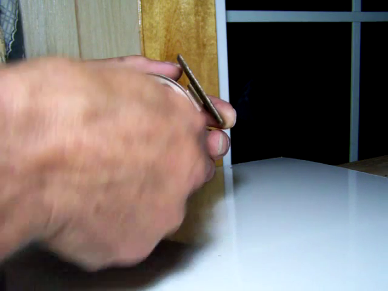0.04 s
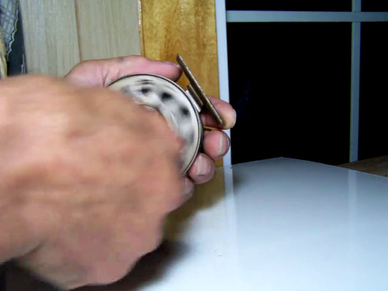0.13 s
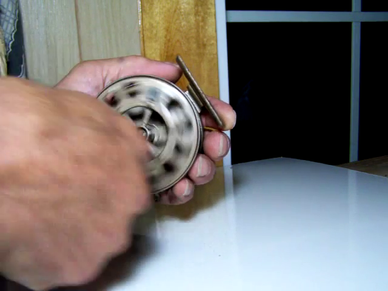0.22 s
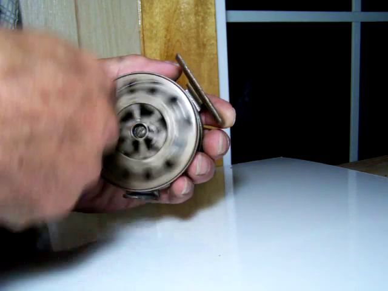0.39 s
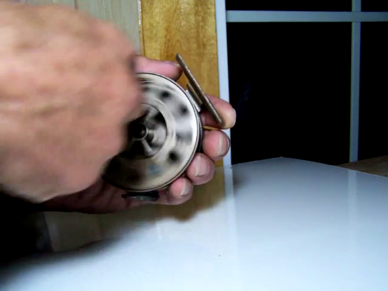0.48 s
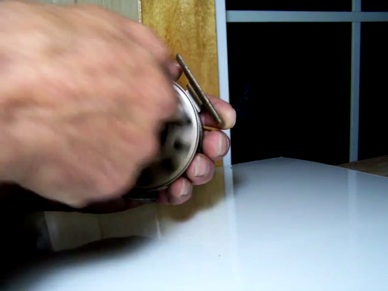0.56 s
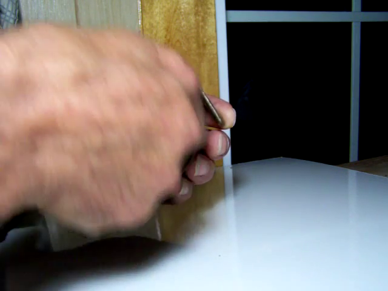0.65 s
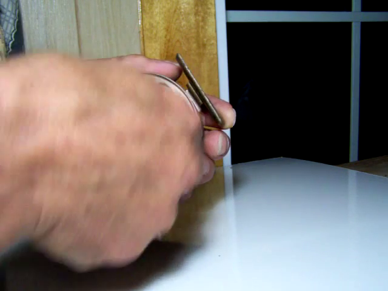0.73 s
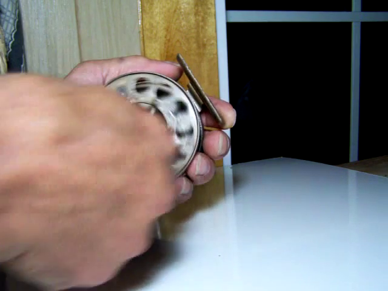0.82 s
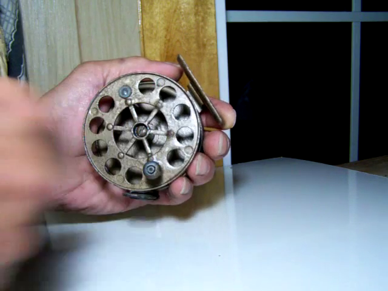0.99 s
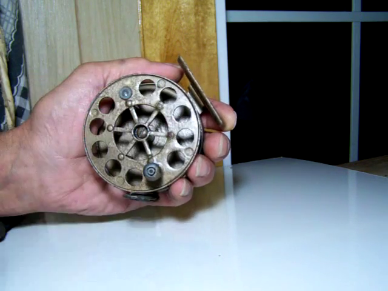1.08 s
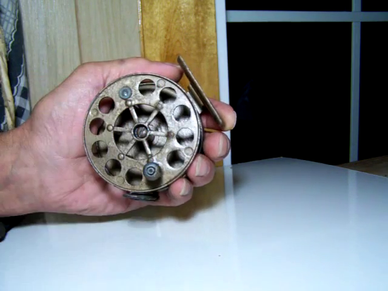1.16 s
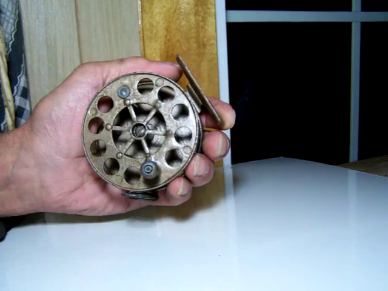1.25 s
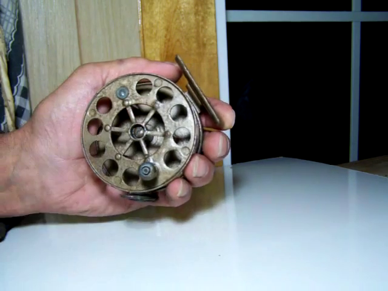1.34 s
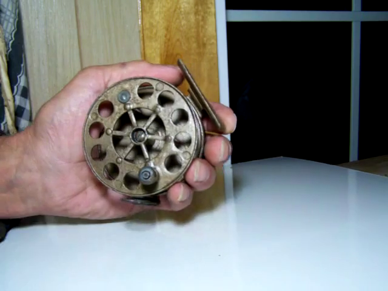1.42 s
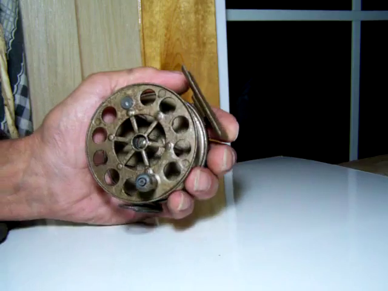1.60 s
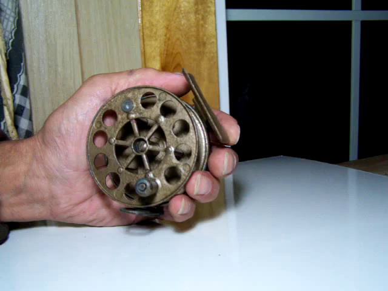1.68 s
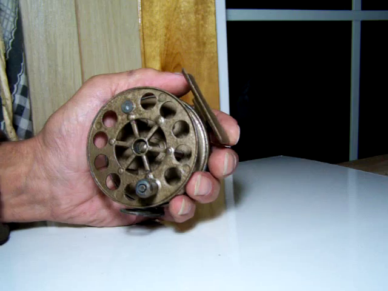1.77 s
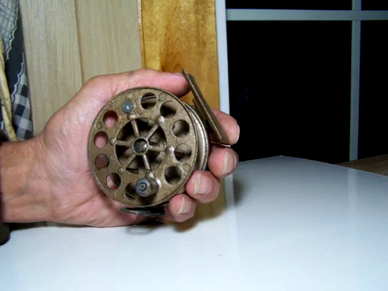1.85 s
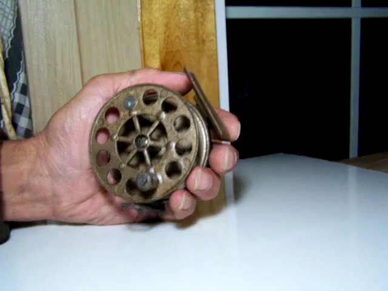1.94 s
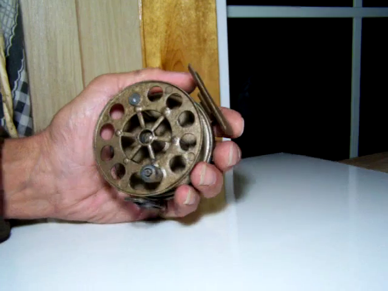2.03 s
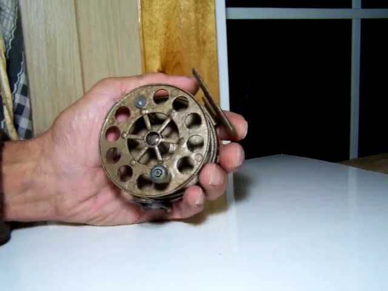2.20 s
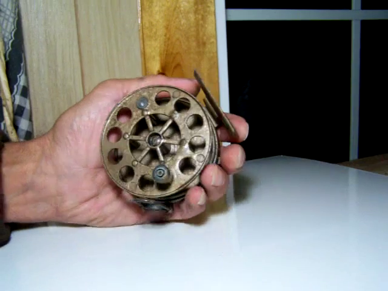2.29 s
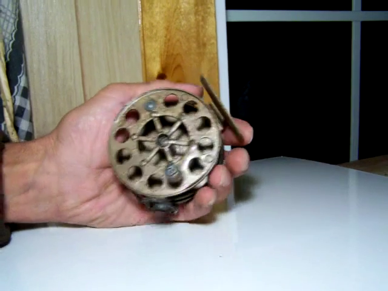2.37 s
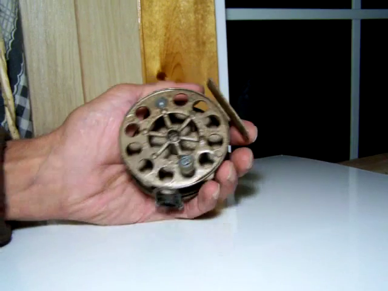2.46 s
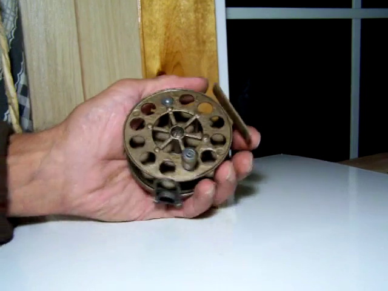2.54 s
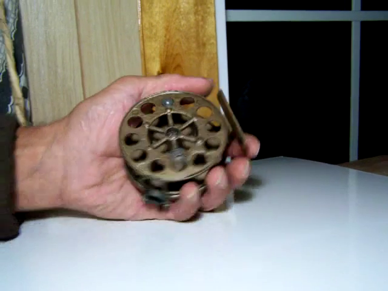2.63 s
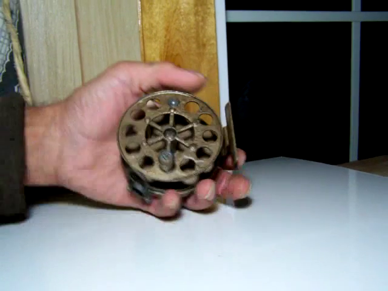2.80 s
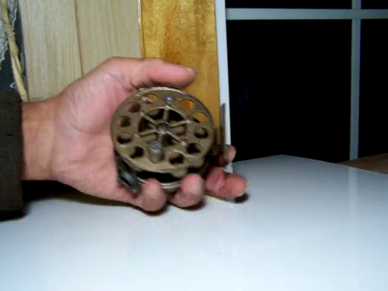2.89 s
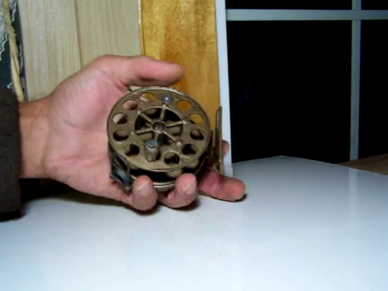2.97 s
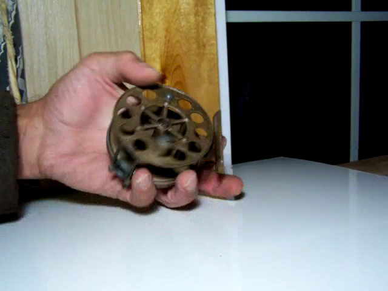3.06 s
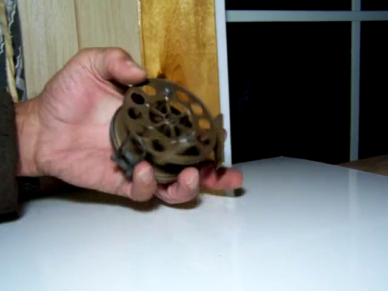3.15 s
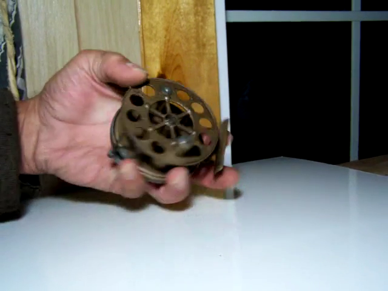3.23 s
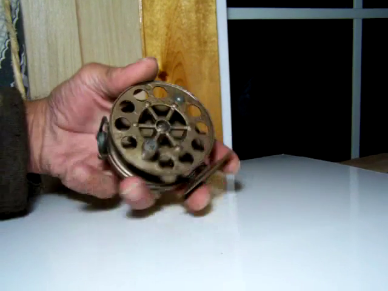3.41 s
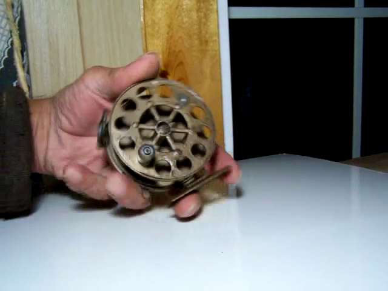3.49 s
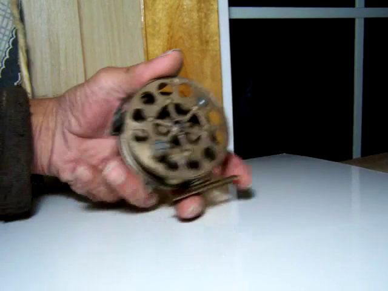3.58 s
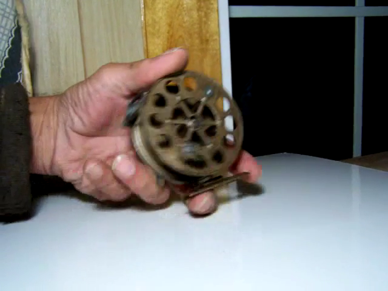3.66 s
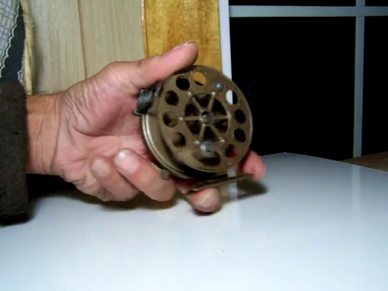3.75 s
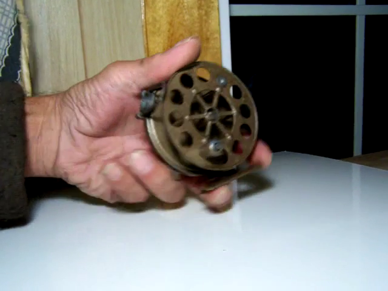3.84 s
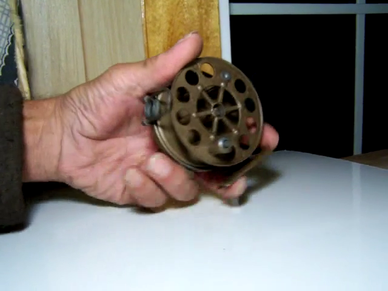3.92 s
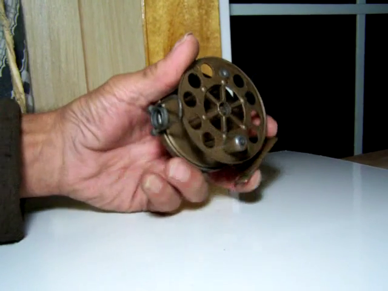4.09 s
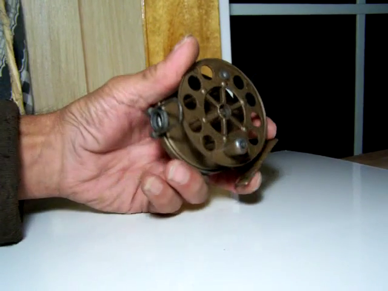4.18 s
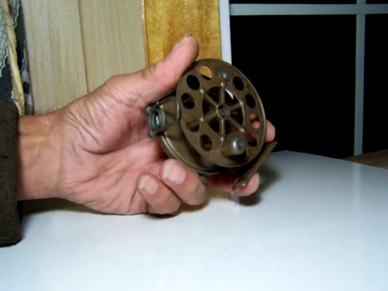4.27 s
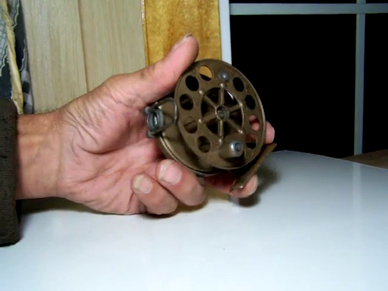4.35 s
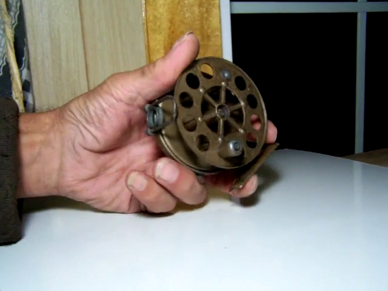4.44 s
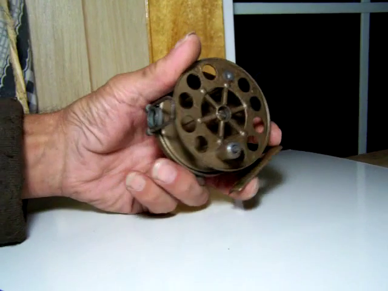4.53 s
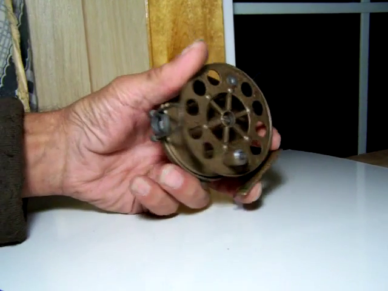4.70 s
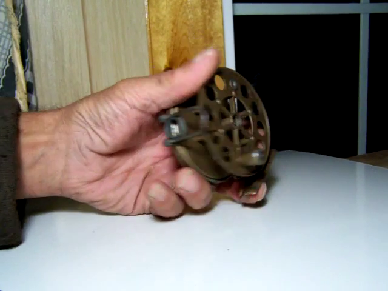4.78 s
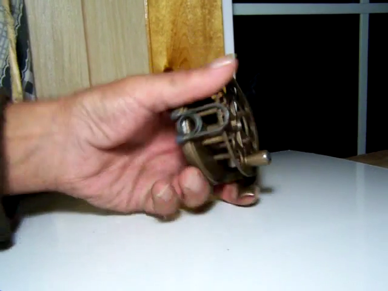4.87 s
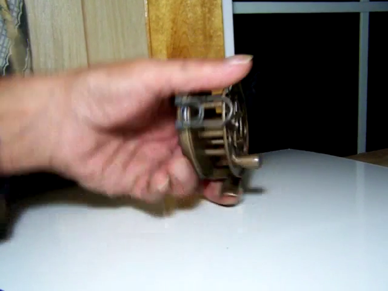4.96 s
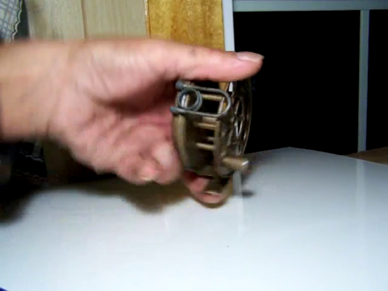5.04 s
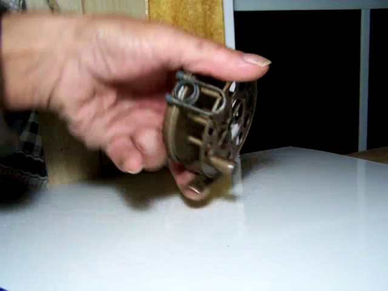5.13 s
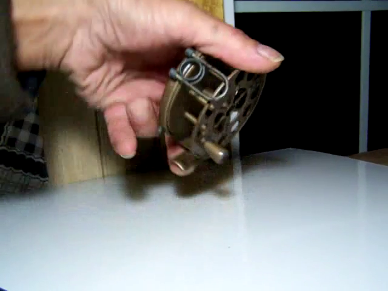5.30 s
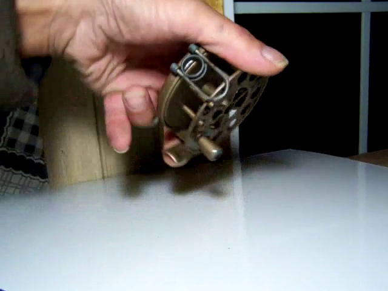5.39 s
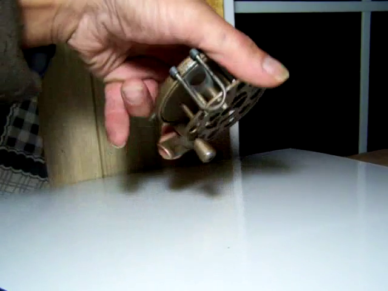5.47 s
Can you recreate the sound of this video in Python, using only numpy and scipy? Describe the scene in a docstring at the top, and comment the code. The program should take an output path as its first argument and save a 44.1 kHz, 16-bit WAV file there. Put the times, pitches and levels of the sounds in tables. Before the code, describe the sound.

A hand-spun brass reel gives a rapid, regular ratchet of high, dry metallic clicks, then stops. After a quiet gap with cloth rustle come grainy skin-on-metal rubbing, small squeaks, a single loud click with a brief rattle, and clacking loose parts. Close indoor recording with slight short room reflections, quiet hum and hiss.

```python
"""An old brass fly reel clicks close to the microphone: its pawl snaps over the ratchet teeth.
Each click is a contact and brief noisy chatter through resonances, with decaying tones after it.
After the hardest snap the pawl buzzes on its spring, and loose parts knock through the frame's resonances.
Fingers rub the frame as a stream of tiny slips; a sleeve swishes as shaped noise.
Behind them an appliance hums in steady sines over the hiss of a small room."""
import sys
import numpy as np
from scipy import signal
from scipy.fft import rfft, irfft, next_fast_len
from scipy.io import wavfile

SR = 44100
rng = np.random.default_rng(int(sys.argv[2]) if len(sys.argv) > 2 else 0)


def unload_wav(signal):
    """Save mono or channel-first audio to the path in sys.argv[1] as 16-bit WAV at rate SR, clipped to [-1, 1]."""
    wavfile.write(
        sys.argv[1],
        SR,
        np.round(np.clip(np.atleast_2d(signal).T, -1, 1) * 32767).astype(np.int16),
    )


N = 243431
TIME = np.arange(N) / SR

# Pawl dropping into a tooth gap; the chatter is scaled for all clicks together
# columns: start_s, strength_db, ring_pitch_hz, chatter_s [s, dB, Hz, s before scaling]
PAWL_DROPS = [(0.0209, -12, 3720, 0.002), (0.083, -13.5, 3860, .0036), (0.1385, -15.5, 3890, 0.0036),
              (0.2027, -15, 4060, 0.0024), (0.2642, -13.5, 3790, 0.0031), (0.3228, -13.5, 3680, 0.0031),
              (0.387, -14.5, 3600, 0.0026), (0.4464, -13, 3930, 0.003), (.4912, -14.5, 3990, 0.0015),
              (.541, -14.5, 3990, 0.0025), (0.5952, -13, 3620, 0.003), (.656, -13, 3920, 0.0022),
              (0.7181, -12.5, 4020, 0.0049), (0.7696, -14, 3800, 0.0029), (0.8307, -16.5, 3760, 0.003),
              (0.8944, -13.5, 3980, .0031), (2.3914, -30, 3580, 0.0096), (3.862, -8, 4020, 0.0023),
              (5.3945, -27.5, 3530, 0.0022)]
# Three pushes of the fingers on the frame, one curve each
# columns: time_s, pressure_db, hiss_against_pressure_db [s, dB, dB]
FINGER_PUSHES = [
    [(2.002, -32.5, -30), (2.016, -21.5, -20), (2.172, -33.5, -17.5), (2.214, -29, -13), (2.324, -33, -9.5),
     (2.402, -23.5, -14), (2.452, -35.5, -17), (2.514, -33.5, -20), (2.53, -42, -14)],
    [(2.53, -40.5, -13), (2.666, -31, -15.5), (2.704, -37, -9), (2.75, -32, -13), (2.868, -33.5, -14),
     (2.874, -37, -9), (2.95, -42.5, -16), (3.024, -34, -14), (3.14, -42, -7)],
    [(3.14, -44, -10), (3.194, -36.5, -10.5), (3.282, -38.5, -7), (3.526, -30, -15), (3.578, -35, -16.5),
     (3.664, -31, -17), (3.692, -39, -8), (3.728, -56, -26), (3.75, -47, -11)],
]

JOLT_ABOVE_DB = -14  # a harder blow than this jolts the whole reel
USUAL_RUB_DB = -33


def from_db(db):
    """Decibels to gain."""
    return 10 ** (np.asarray(db) / 20)


def rms_one(x):
    """Scale to an rms of 1."""
    return x / np.sqrt(np.mean(x ** 2) + 1e-20)


def band(x, low_hz, high_hz, order=3):
    """Causal band-pass."""
    sos = signal.butter(order, [low_hz, high_hz], "band", fs=SR, output="sos")
    return signal.sosfilt(sos, x + 1e-18)


def coloured(x, points):
    """Shape a spectrum with gains at (Hz, dB) points, joined along log frequency."""
    hz, db = np.transpose(points)
    size = next_fast_len(N)
    bins_hz = np.maximum(np.fft.rfftfreq(size, 1 / SR), 1)
    gain_db = np.interp(np.log(bins_hz), np.log(hz), db, left=-90, right=-90)
    return irfft(rfft(x, size) * from_db(gain_db), size)[:N]


def resonate(x, modes):
    """Damped resonances of (Hz, width Hz, dB) in parallel, with alternating sign."""
    out = 0
    for k, (hz, width_hz, db) in enumerate(modes):
        radius = np.exp(-np.pi * width_hz / SR)
        poles = [1, -2 * radius * np.cos(2 * np.pi * hz / SR), radius * radius]
        gain = (-1) ** k * from_db(db) * (1 - radius * radius) / 2
        out = out + gain * signal.lfilter([1, 0, -1], poles, x)
    return out


def gain_curve(times, db):
    """Gain along a level curve, practically silent outside it."""
    return from_db(np.interp(TIME, times, db, left=-120, right=-120))


def drift(rate_hz):
    """Random wavering below a rate, with a spread of 1."""
    sos = signal.butter(2, rate_hz, fs=SR, output="sos")
    # the first second lets the filter settle
    return rms_one(signal.sosfilt(sos, rng.standard_normal(N + SR))[SR:])


def add(track, start_s, sound):
    """Mix a sound into the track at a time."""
    at = max(round(start_s * SR), 0)
    track[at:at + len(sound)] += sound[:max(N - at, 0)]


def blows(rows, modes, ringing, ring_width_hz, first_contact, chatter_scale):
    """Each blow is one contact and milliseconds of chatter through resonances; long modes ring on."""
    # Edges between thud, clack, ring and tick; column: edge_hz [Hz]
    registers = [150, 1200, 3000, 5000, 9000]
    out, t = np.zeros(N), TIME[:SR // 2]
    attack = SR // 100
    for start_s, *levels_db, pitch_hz, chatter_s in rows:
        fade = np.exp(-(t[:2 * attack] / (chatter_s * chatter_scale)) ** 2)
        force = rng.standard_normal(2 * attack) * fade
        force[0] += first_contact
        force = np.pad(force, (0, 2 * attack))
        body = resonate(force, [(pitch_hz, ring_width_hz, 0), *modes])
        # the point of contact decides how much each register sounds
        for db, low_hz, high_hz in zip(levels_db, registers, registers[1:]):
            part = band(body, low_hz, high_hz)
            attack_rms = np.sqrt(np.mean(part[:attack] ** 2))
            add(out, start_s, from_db(db) * part / attack_rms)
        # the weaker of thud and clack decides how strongly the long modes wake
        weight_db = min(levels_db[:2])
        for hz, t60_s, db in ringing:
            tone = np.sin(2 * np.pi * (hz * t + rng.random()))
            add(out, start_s, from_db(weight_db + db - 60 * t / t60_s) * tone)
    return out


def pawl_blows():
    """All clicks share one balance of registers; a snap above the jolt point gains extra thud."""
    # Thud, clack, ring and tick against the click's strength; column: level_db [dB]
    balance_db = [-36.5, -16, -0.5, -12.5]
    jolt_growth = 3.74  # extra dB of thud per dB
    rows = []
    for start_s, strength_db, pitch_hz, chatter_s in PAWL_DROPS:
        thud, clack, ring, tick = strength_db + np.array(balance_db)
        thud = thud + jolt_growth * max(strength_db - JOLT_ABOVE_DB, 0)
        rows.append((start_s, thud, clack, ring, tick, pitch_hz, chatter_s))
    return rows


def after_ring(detune):
    """Each click leaves two close decaying tones; above the jolt point they grow no louder."""
    level_db, t60_s = -4, 0.085
    out, t = np.zeros(N), TIME[:SR // 4]
    for start_s, strength_db, pitch_hz, _ in PAWL_DROPS:
        pitches_hz = (pitch_hz, pitch_hz * (1 - detune))
        pair = sum(np.sin(2 * np.pi * (hz * t + rng.random())) for hz in pitches_hz)
        envelope_db = min(strength_db, JOLT_ABOVE_DB) + level_db - 60 * t / t60_s
        add(out, start_s, from_db(envelope_db) * pair / 2)
    return out


def pawl_clicking():
    """The pawl strikes the teeth: its spring and the spool resonate, then its pitch sings on."""
    # Damped resonances of pawl and spring; columns: pitch_hz, width_hz, level_db [Hz, Hz, dB]
    pawl_modes = [(620, 770, -10.5), (960, 97, -15), (1553, 154, 4), (2102, 370, 2.5), (2630, 67, -49),
                  (3930, 1800, -17), (4850, 780, -2.5), (6100, 2010, -1.5), (7640, 720, -10),
                  (8700, 650, -45.5)]
    # Long ringing of the spool; columns: pitch_hz, t60_s, level_db [Hz, s, dB]
    spool_modes = [(2073, 0.56, -18), (3480, 0.25, -25.5), (4000, .25, -15), (4300, .16, -12),
                   (5030, 0.82, -21)]
    clicks = blows(pawl_blows(), pawl_modes, spool_modes, ring_width_hz=300,
                   first_contact=2.3, chatter_scale=1.48)
    return clicks + after_ring(detune=0.051)


def rattle(jitter, bounce_s):
    """Quick, slightly uneven bounces, each a tiny noisy scrape, sound the pawl's spring."""
    # Resonances of the buzzing spring; columns: pitch_hz, width_hz, level_db [Hz, Hz, dB]
    spring_modes = [(1950, 78, -6), (3800, 180, 1), (4260, 370, -3.5), (5320, 200, -3.5)]
    start_s, level_db = 3.878, -34.5
    bounces_per_s, hold_s, t60_s = 150, 0.033, 0.19
    t, force, out = TIME[:SR // 2], np.zeros(SR // 2), np.zeros(N)
    gaps_s = (1 + jitter * rng.uniform(-1, 1, size=60)) / bounces_per_s
    hits = (np.cumsum(gaps_s) - gaps_s[0]) * SR
    force[np.minimum(hits, len(t) - 1).clip(0).astype(int)] = 1
    # each hit decays over the bounce time
    force = signal.lfilter([1], [1, -np.exp(-1 / (bounce_s * SR))], force)
    buzz = rms_one(resonate(force * rng.standard_normal(len(t)), spring_modes))
    fade_db = -60 * np.maximum(t - hold_s, 0) / t60_s
    add(out, start_s, from_db(level_db + fade_db) * buzz)
    return out


def knock_blows():
    """Heft feeds the clack and hardness the tick; light parts lose thud, hard knocks gain it."""
    # Knocks of loose parts, plus two faint single pawl clicks (1.7953 s, 4.7335 s) sounded the same way; the
    # chatter is scaled for all rows together # columns: start_s, strength_db, heft_db, hardness_db, pitch_hz,
    # chatter_s # [s, dB, dB, dB, Hz, s before scaling]
    knock_rows = [(1.7953, -36, 2, 18, 3700, 0.0061), (2.0035, -27, -23, -1, 4200, .006),
                  (2.0187, -19, -17, -15, 4100, 0.0003), (2.0565, -20.5, -0.5, -12, 4230, 0.015),
                  (3.7145, -51, 17.5, -6, 1960, .0023), (4.564, -22.5, 4, -14.5, 4050, 0.015),
                  (4.5711, -20.5, 7, 10.5, 1550, 0.0028), (4.7335, -45.5, -15, 6, 3630, 0.0018),
                  (4.9645, -49.5, 6, 13, 3620, 0.017), (5.013, -49.5, 7, -9, 3830, 0.0048),
                  (5.1573, -22.5, -1, -18, 3900, 0.008), (5.1687, -7.5, -3, 6, 4240, 0.003),
                  (5.1897, -13, -0.5, -12, 4000, 0.0029), (5.2324, -26, -1, -22, 4030, 0.0037),
                  (5.314, -28, -8, 13.5, 4250, 0.00076), (5.353, -45.5, 4, -10, 700, 0.018)]
    # Thud, clack, ring and tick of a plain knock against its strength; column: level_db [dB]
    balance_db = [-13, -5, -0.5, -23.5]
    light_thud_share = 0.64  # dB of thud lost per dB of missing heft
    jolt_growth = 0.31  # extra dB of thud per dB
    rows = []
    for start_s, strength_db, heft_db, hardness_db, pitch_hz, chatter_s in knock_rows:
        thud, clack, ring, tick = strength_db + np.array(balance_db)
        thud = thud + light_thud_share * min(heft_db, 0)
        thud = thud + jolt_growth * max(strength_db - JOLT_ABOVE_DB, 0)
        rows.append((start_s, thud, clack + heft_db, ring, tick + hardness_db, pitch_hz, chatter_s))
    return rows


def loose_knocking():
    """Loose parts strike the frame, which rings through its own resonances."""
    # Damped resonances of the frame in the palm
    # columns: pitch_hz, width_hz, level_db [Hz, Hz, dB]
    frame_modes = [(169.5, 48, -2), (552, 63, -5.5), (666, 54, -4), (940, 126, -3.5), (1440, 360, -7.5),
                   (1768, 64, -0.5), (2040, 180, -3.5), (2590, 210, -3), (3410, 400, -13.5),
                   (4100, 270, -24.5), (5250, 2500, -18.5), (5850, 530, -14.5)]
    # Long ringing of the frame; columns: pitch_hz, t60_s, level_db [Hz, s, dB]
    frame_ring = [(777.3, 0.27, -7.5), (855, 0.5, -15.5), (2544, 0.15, -1.5), (3360, 0.26, -15)]
    return blows(knock_blows(), frame_modes, frame_ring, ring_width_hz=225,
                 first_contact=1.0, chatter_scale=0.83)


def finger_pressure():
    """Finger pressure in dB over the usual: long pushes, and brushes that swell, hold and fade."""
    # Light brushes of a fingertip; columns: start_s, length_s, pressure_db [s, s, dB]
    light_brushes = [(4.252, 0.11, -44.5), (4.463, 0.21, -47.5)]
    attack_s, release_s = 0.052, 0.028
    times, push_db, _ = np.concatenate(FINGER_PUSHES).T
    gain = gain_curve(times, push_db)
    for start_s, length_s, db in light_brushes:
        swell = (TIME - start_s) / attack_s
        fade = 1 - (TIME - start_s - length_s) / release_s
        gain = gain + from_db(db) * np.clip(np.minimum(swell, fade), 0, 1)
    return 20 * np.log10(gain) - USUAL_RUB_DB


def rubbing(grains_per_s, spread_db, smooth_share, grip_db, damping_db):
    """Skin sticks and slips: dense tiny slips under a wavering grip sound the frame's resonances."""
    # Colour of the rubbing; columns: frequency_hz, level_db [Hz, dB]
    rub_spectrum = [(350, -18.5), (700, -17.5), (1200, -16), (1500, -10), (1650, -13.5), (2200, -7),
                    (2540, -2.5), (3000, -18.5), (3450, -16), (3800, -6.5), (4250, -8), (4900, -23.5),
                    (6500, -26), (9000, -43.5), (10000, -36)]
    # Narrow resonances that stand out; columns: pitch_hz, width_hz, level_db [Hz, Hz, dB]
    rub_modes = [(737, 59, 4.5), (937, 100, 5.5), (1785, 20, 6.5), (2660, 52, -11)]
    # Body, ring and hiss of the rubbing
    # columns: offset_db, growth [dB at the usual pressure, dB per dB of pressure]
    response = [(-3.5, 0.74), (1, 1), (-3, 1)]
    sizes = from_db(spread_db * np.minimum(rng.exponential(1, N), 5)) * rng.choice([-1, 1], N)
    slips = rms_one(sizes * (rng.random(N) < grains_per_s / SR))
    slips = slips + smooth_share * rng.standard_normal(N)
    frame = coloured(slips, rub_spectrum)
    # the sliding fingers damp and free each resonance on its own
    frame = frame + sum(resonate(frame, [mode]) * from_db(damping_db * drift(9)) for mode in rub_modes)

    times, _, hiss_db = np.concatenate(FINGER_PUSHES).T
    pressure_db, grip = finger_pressure(), drift(77)
    body, ring, hiss = (USUAL_RUB_DB + db + growth * pressure_db for db, growth in response)
    levels_db = body, ring, hiss + np.interp(TIME, times, hiss_db)
    bands_hz = [(350, 3000), (3000, 5000), (5000, 9500)]
    out = 0
    for db, (low_hz, high_hz) in zip(levels_db, bands_hz):
        # a shared fast waver and a slower one for each band
        waver = from_db(grip_db * (grip + drift(35)))
        out = out + from_db(db) * rms_one(band(frame, low_hz, high_hz, order=4) * waver)
    return out


def squeaks(waver):
    """Now and then the slips lock into a brief tone of slightly unsteady pitch."""
    # Short squeaks of skin on brass; columns: centre_s, pitch_hz, peak_db, half_length_s [s, Hz, dB, s]
    squeak_table = [(2.058, 2520, -14, 0.0047), (2.1, 755, -21, 0.0052), (2.111, 2520, -22.5, 0.0057),
                    (2.223, 2250, -22.5, 0.0033), (2.512, 2620, -30, 0.0067)]
    out, unsteady = 0, 1 + waver * drift(258)
    for centre_s, hz, db, half_length_s in squeak_table:
        swell = np.exp(-np.minimum(((TIME - centre_s) / half_length_s) ** 2, 20))
        out = out + from_db(db) * swell * np.sin(2 * np.pi * hz * np.cumsum(unsteady) / SR)
    return out


def sleeve():
    """Cloth sliding as the arm draws back: a soft, wide hiss."""
    # Level of the swish; columns: time_s, level_db [s, dB]
    swish_curve = [(.98, -54.5), (1.05, -44), (1.12, -35), (1.18, -38.5), (1.22, -34.5), (1.26, -44.5),
                   (1.35, -49), (1.7, -48), (1.95, -52)]
    # Colour of the cloth; columns: frequency_hz, level_db [Hz, dB]
    cloth_spectrum = [(150, -38), (250, -21.5), (598, -3), (710, -15.5), (796, -6), (2110, -7.5),
                      (2610, -7), (3520, -3), (4830, -8), (7630, -30), (9920, -42), (16800, -120)]
    cloth = rms_one(coloured(rng.standard_normal(N), cloth_spectrum))
    return gain_curve(*np.transpose(swish_curve)) * cloth


def room(x, tail_db, echoes, build_up_s, wall_low_hz, wall_top_hz):
    """Any distinct echoes from nearby surfaces, with a short diffuse tail, in a limited band."""
    t60_s = 0.38
    t = TIME[:SR // 2]
    tail = rng.standard_normal(len(t)) * from_db(-60 * t / t60_s)
    tail = tail * (1 - np.exp(-(t / build_up_s) ** 2))
    response = from_db(tail_db) * tail / np.linalg.norm(tail)
    for delay_s, db in echoes:
        add(response, delay_s, from_db([db]))
    return band(signal.fftconvolve(x, response)[:N], wall_low_hz, wall_top_hz, order=1)


def background(hum_db, hiss_db):
    """Appliance hum as steady sines over room hiss, both quieter while the ratchet runs."""
    # Hum lines before the hum trim and background curve; columns: pitch_hz, rms_db [Hz, dB]
    hum_lines = [(30.4, -57.5), (61, -45), (91.5, -79), (122, -52), (183.3, -56), (274.5, -59.5),
                 (305.3, -55.5), (366.3, -65.5)]
    # Colour of the hiss before the low cut; columns: frequency_hz, level_db [Hz, dB]
    hiss_spectrum = [(15, -51), (25, -10.5), (65, -5.5), (130, -16), (151, -17.5), (174, -18.5),
                     (301, -18.5), (562, -24.5), (785, -29), (951, -27.5), (1530, -30.5), (1770, -26),
                     (7630, -39.5), (9920, -63), (16800, -120)]
    # Level of hum and hiss together; columns: time_s, gain_db [s, dB]
    level_curve = [(0, -14), (.93, -14.5), (1.05, -8), (1.2, -3), (5.5, -3)]
    hum = 0
    for hz, db in hum_lines:
        tone = np.sin(2 * np.pi * (hz * TIME + rng.random()))
        hum = hum + np.sqrt(2) * from_db(db + hum_db) * tone
    hiss = coloured(rng.standard_normal(N), hiss_spectrum)
    hiss = signal.sosfilt(signal.butter(1, 150, "high", fs=SR, output="sos"), hiss)
    # the hiss level is set by its 400-10000 Hz band
    hiss = from_db(hiss_db) * hiss / np.std(band(hiss, 400, 10000))
    return (hum + hiss) * from_db(np.interp(TIME, *np.transpose(level_curve)))


def scene():
    """The reel in its room; the pawl radiates freely, knocks in the palm stay drier."""
    # Nearby surfaces; columns: delay_s, level_db [s, dB before the wall band-pass]
    surfaces = [(.0098, -13), (.0125, -22), (.0205, -22)]
    pawl = pawl_clicking()
    knocks = loose_knocking()
    rub = rubbing(grains_per_s=1500, spread_db=0.96, smooth_share=0.76, grip_db=0.5, damping_db=1.0)
    rub = rub + squeaks(waver=0.034)
    pawl = pawl + room(pawl, tail_db=-10.5, echoes=surfaces, build_up_s=0.014,
                       wall_low_hz=2270, wall_top_hz=4800)
    knocks = knocks + room(knocks, tail_db=-21, echoes=[], build_up_s=0.0023,
                           wall_low_hz=300, wall_top_hz=3500)
    buzz = rattle(jitter=0.17, bounce_s=0.0018)
    mix = pawl + buzz + knocks + rub + sleeve() + background(hum_db=-1.5, hiss_db=-49)
    return mix[None]


def record(dry):
    """The microphone rounds peaks and dulls the top; the input clips at full scale, then a low-pass."""
    headroom, mic_top_hz, cutoff_hz = 2, 8840, 18000
    rounded = headroom * np.tanh(dry / headroom)
    heard = signal.sosfilt(signal.butter(8, mic_top_hz, fs=SR, output="sos"), rounded)
    clipped = np.clip(heard, -1, 1)
    return signal.sosfilt(signal.butter(12, cutoff_hz, fs=SR, output="sos"), clipped)


dry = scene()
out = record(dry)
unload_wav(out)
```